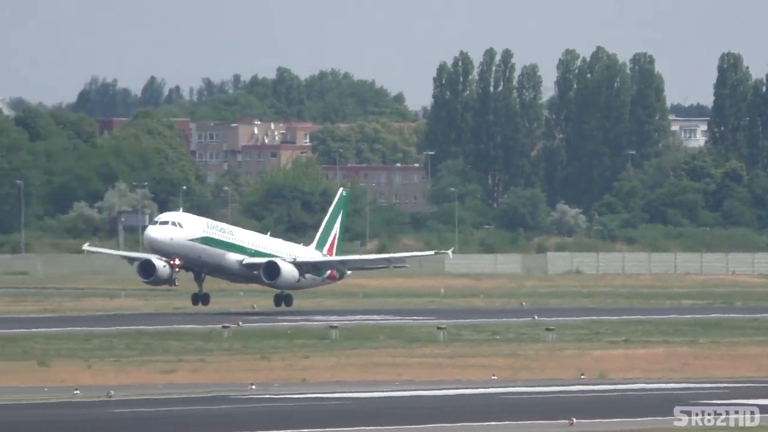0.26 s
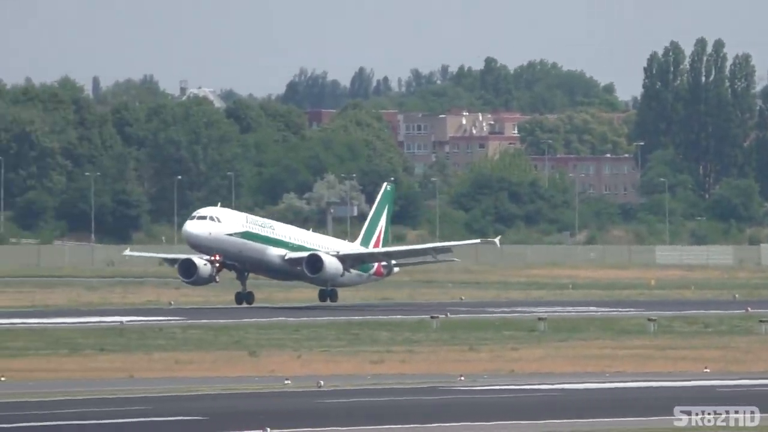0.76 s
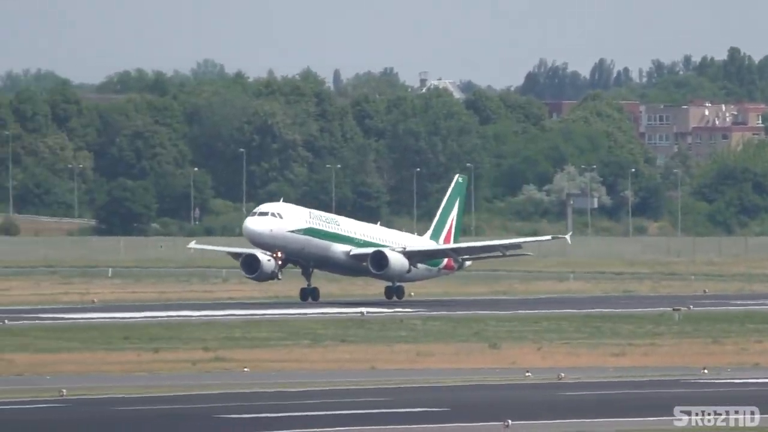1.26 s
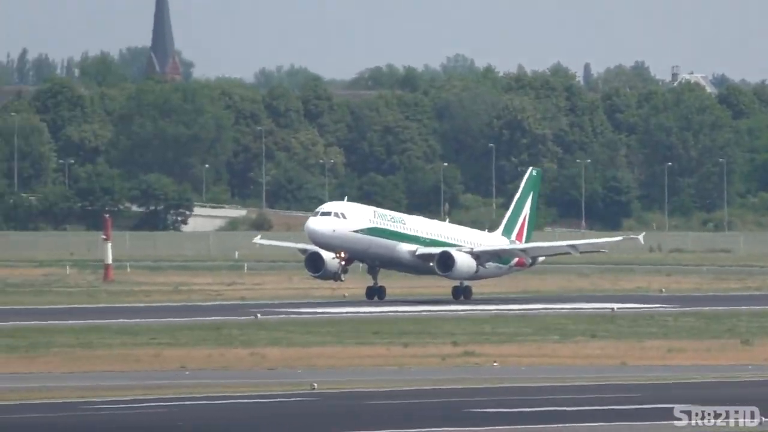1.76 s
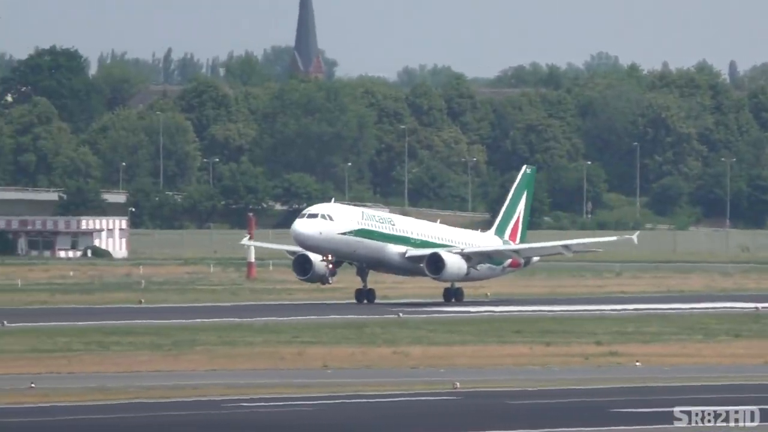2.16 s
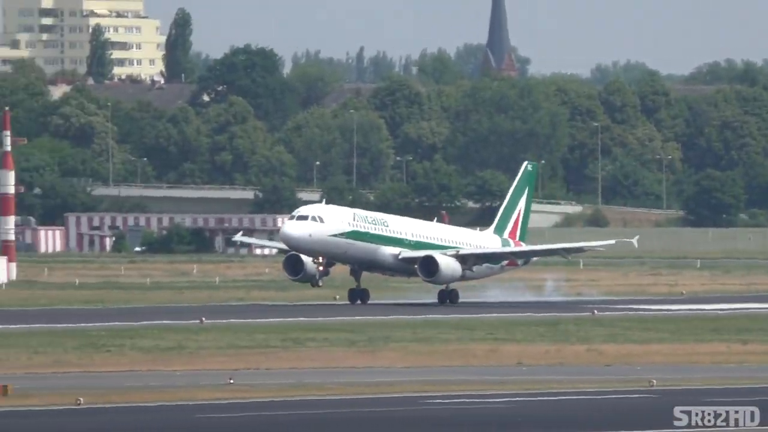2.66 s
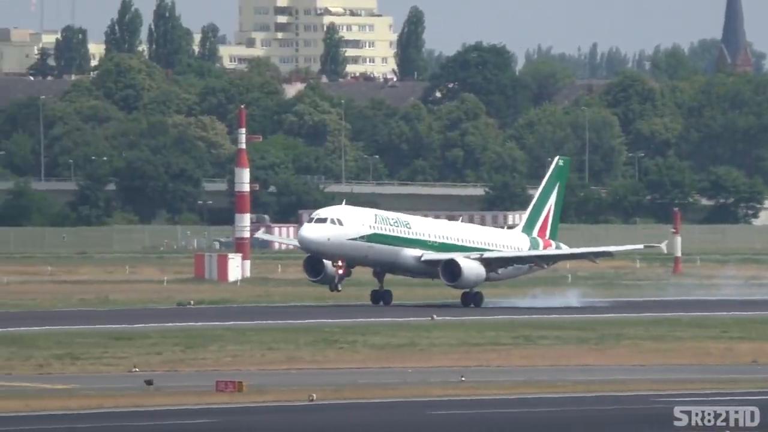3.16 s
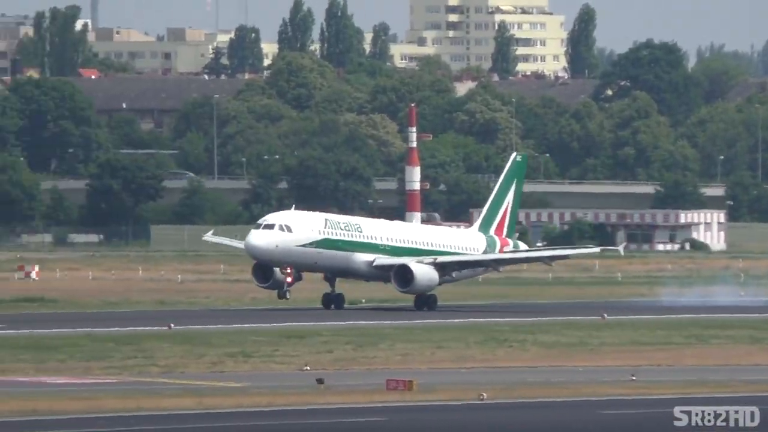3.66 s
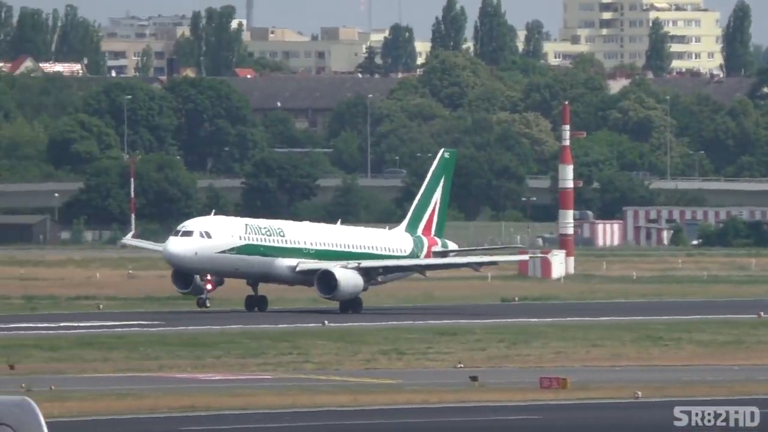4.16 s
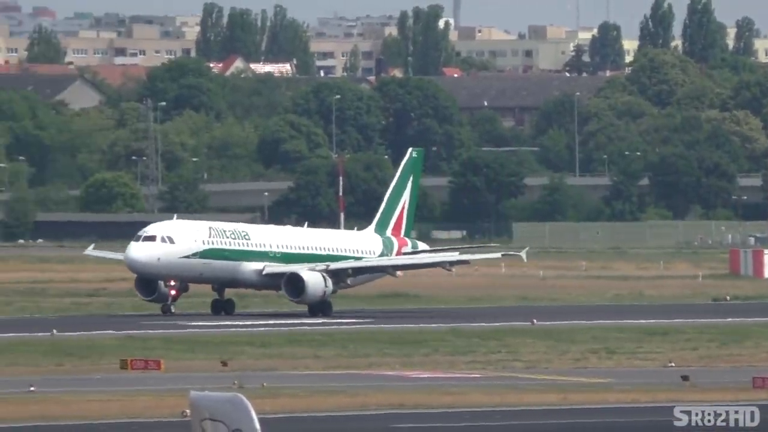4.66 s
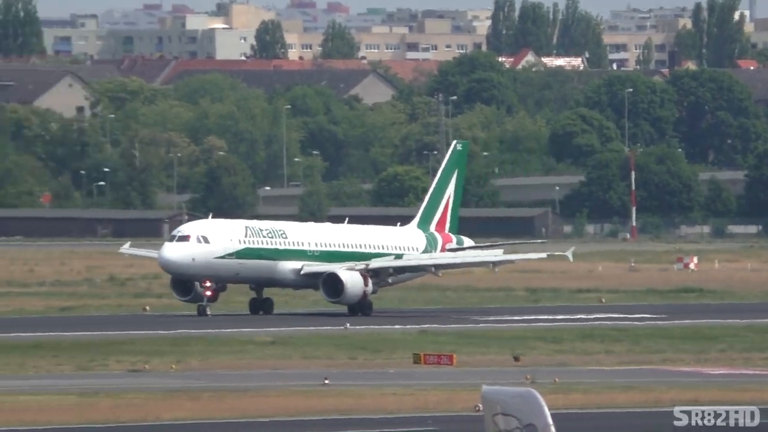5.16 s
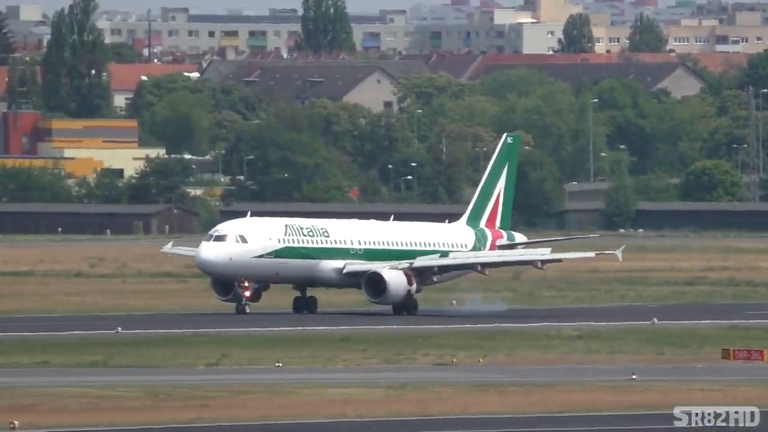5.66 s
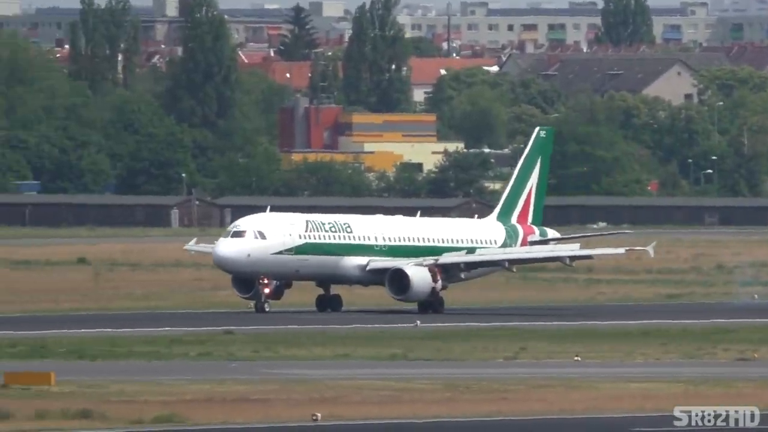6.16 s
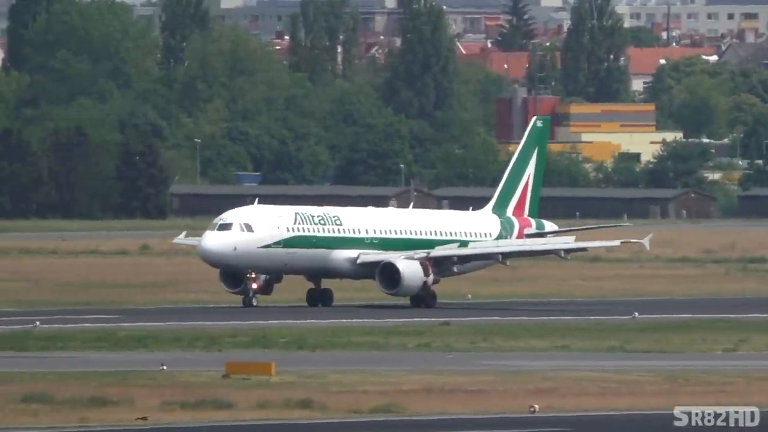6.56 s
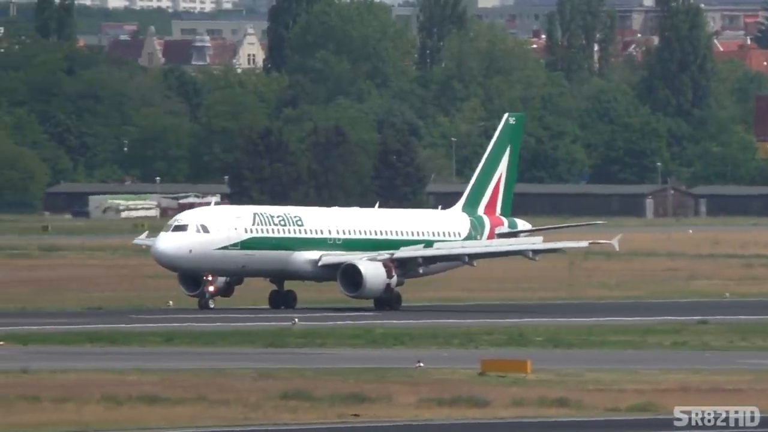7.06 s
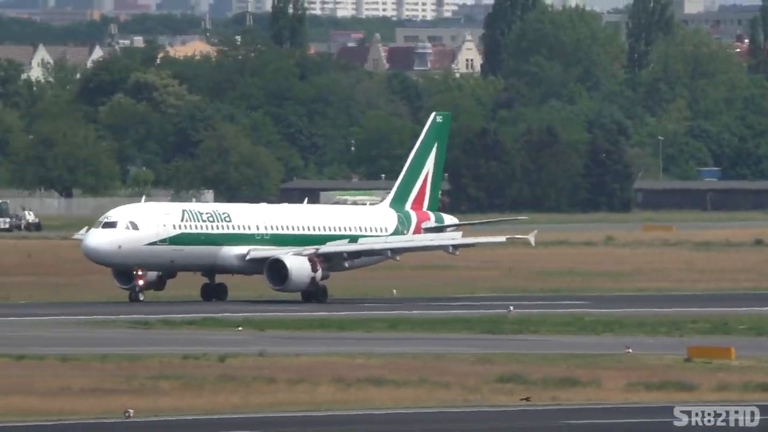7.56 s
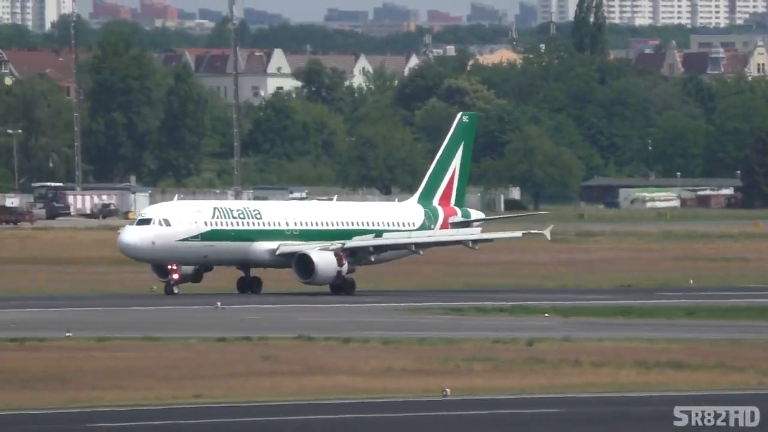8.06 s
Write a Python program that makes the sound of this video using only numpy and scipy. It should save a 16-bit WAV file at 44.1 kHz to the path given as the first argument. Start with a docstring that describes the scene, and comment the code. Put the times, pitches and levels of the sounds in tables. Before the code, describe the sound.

Outdoors beside an airfield, wind presses on an unprotected microphone with deep, uneven rumble and flutter, louder than everything else. Behind it a distant twin-engine jet rolls past with a steady dull roar and a thin, wavering fan whine. A tiny buzz and later a faint falling whistle slip by. Around six and a half seconds, three hard gusts thump close together and briefly push the engine sound down.

```python
"""A distant twin-engine airliner runs along a runway: its exhaust is shaped noise, roaring dully.
Over it lie two fans' blade tones and thin turbine tones, wavering as turbulent air scatters them.
Wind eddies rumble and flutter on the microphone as band-shaped noise; hard buffets are short pressure swings.
A brief buzz of ticks, a faint falling whistle and white microphone hiss are added.
The recorder's limiter ducks everything under the hardest buffets."""
import sys
import numpy as np
from scipy import signal
from scipy.fft import rfft, irfft, next_fast_len
from scipy.io import wavfile
from scipy.ndimage import uniform_filter1d, minimum_filter1d

SR = 44100
rng = np.random.default_rng(int(sys.argv[2]) if len(sys.argv) > 2 else 0)


def pcm_store(signal):
    """Save signal as 16-bit PCM."""
    levels = np.round(np.clip(np.atleast_2d(signal), -1, 1) * 32767)
    wavfile.write(sys.argv[1], SR, levels.astype(np.int16).T)


N = 366471
TIME = np.arange(N) / SR  # s

# Exhaust mixing roar, fan rush and engine hiss: (frequency [Hz], relative spectral level [dB])
ROAR_SPECTRUM = [(60, 3), (150, 4.5), (250, 9), (340, 7), (420, 1), (500, 3), (700, -2), (1000, -3.5),
                 (1500, -7.5), (2100, -13.5), (3000, -34.5), (5000, -46)]
RUSH_SPECTRUM = [(1200, -9), (2000, 0), (2450, -0.5), (2900, 0), (3500, -4), (4200, -11.5), (4900, -18),
                 (6000, -20.5), (8000, -36)]
HISS_SPECTRUM = [(3500, -22), (5000, 5.5), (6300, 1.5), (7400, 0.5), (8200, 4), (9200, -4), (10000, -6),
                 (11000, -12.5), (12200, -14), (12850, -7), (13300, -13.5), (16000, -15.5)]
# How well the moving air carries the engine noise: (time [s], relative level [dB])
AIR_CARRY = [(0, -1.5), (1.1, 1.5), (2.0, 1.5), (2.25, 0.1), (3.0, 0.8), (3.2, -2.8), (3.5, -1), (3.8, -3),
             (4.25, 1.5), (4.6, -2.5), (4.9, 1.5), (5.8, 0.5), (6.43, 4), (6.68, -3), (7.42, -1.8),
             (7.72, 3), (7.97, 0.1), (8.3, 4.5)]
# Engine layers: (level at mid-run [dB], share of the carry [1], trend as the aircraft turns side-on [dB/s])
ROAR_LAW = (-30.5, 0.72, -0.32)
RUSH_LAW = (-45, 0.83, .08)
HISS_LAW = (-61, 1, .12)
# Whine of the two fans: (time [s], first fan level [dB], second fan level [dB])
FAN_WHINE = [(0, -54, -62.5), (1.35, -59, -56.5), (1.65, -52.5, -51.5), (2.2, -57.5, -59.5),
             (4.5, -55, -60), (5.05, -55.5, -50), (5.6, -56.5, -57), (6.05, -60, -43.5), (6.35, -54, -45),
             (6.6, -52, -53.5), (7.2, -59, -56.5), (7.7, -52, -50.5), (8.3, -47.5, -56)]
# Blade-passing harmonics: (relative line level [dB], relative skirt level [dB], skirt width [Hz])
BLADE_HARMONICS = [(0, -4.5, 95), (-15.5, -12.5, 190), (-20.5, -17, 280), (-46.5, -24, 500)]
# Thin turbine tones before the swell:
# (frequency [Hz], level at the start [dB], level at the end [dB], line width [Hz])
TURBINE_TONES = [(806, -53, -51.5, 4), (916, -48.5, -57, 4), (3888, -67, -58.5, 6), (8722, -81, -86, 8),
                 (9261, -78, -73, 12), (9378, -81, -78.5, 11)]
# Large and small wind eddies on the microphone: (frequency [Hz], relative spectral level [dB])
RUMBLE_SPECTRUM = [(8, -5.5), (18, -10), (28, 1.5), (48, 0.5), (62, -2), (80, -5), (100, -9.5), (130, -17),
                   (200, -43.5), (400, -85)]
FLUTTER_SPECTRUM = [(50, -17), (85, 2), (110, -1.5), (150, -3.5), (200, -6.5), (280, -17), (450, -24.5),
                    (1000, -57)]
# Strength of the wind on the microphone: (time [s], rumble level before trim [dB])
WIND_STRENGTH = [(0, -16.5), (0.33, -14.5), (0.55, -19.5), (1.0, -19.5), (1.5, -14), (2.55, -12),
                 (3.75, -12.5), (4.05, -17), (4.45, -10), (4.85, -16.9), (5.5, -11.5), (6.5, -13),
                 (6.95, -15), (7.38, -11.5), (7.6, -20.5), (7.82, -9.5), (8.14, -25.5), (8.3, -19.5)]
# Single gusts that stir up small eddies: (time [s], lift of the flutter [dB])
WIND_GUSTS = [(0.12, 3.5), (1.46, 7), (2.62, 3.5), (3.09, 3.5), (3.21, 5), (3.64, 4), (4.24, 2.5),
              (5.3, 1.5), (6.06, 4.5), (6.45, 11), (6.55, 7), (7.02, 6.5), (7.79, 3.5), (8.27, 8.5)]
# Hard buffets, ahead of the limiter: (time [s], peak level [dB], eddy frequency [Hz])
WIND_BUFFETS = [(3.212, 1.5, 90), (3.635, 0, 75), (3.668, 1.5, 40), (6.354, 7, 60), (6.456, 8.5, 80),
                (6.562, 5.5, 70)]

FAN_HZ, SECOND_FAN_HZ = 2722, 2758
ROAR_PATCH_DB, ROAR_PATCH_HZ = 1.0, 4  # rms swell of each roar band, corner of its spectrum
SHRILL_HZ, SHRILL_FOLLOWS = 9000, .55
FLUTTER_DB, FLUTTER_FOLLOWS = -26, 0.49  # level at the mean wind, share of the wind's swing
RUMBLE_LUMP_DB, FLUTTER_LUMP_DB, LUMP_HZ = 1.5, 2.08, 7.6  # rms lumps within the wind, their corner
GUST_S, GUST_RUMBLE_SHARE = 0.086, 0.43
BUFFET_S = 0.013
BUZZ_AT_S, BUZZ_S, BUZZ_DB = 3.767, .022, -23.5  # level: tick height before the high-pass
BUZZ_TICKS_PER_S, BUZZ_SLOWS_PER_S2 = 908, 1700  # rate at the middle of the buzz, its fall
WHISTLE_AT_S, WHISTLE_S, WHISTLE_DB = 7.035, .13, -34
WHISTLE_HZ, WHISTLE_FALL_HZ_PER_S = 572, 1300  # pitch at the middle of the whistle, its fall
WHISTLE_RUSH_DB, WHISTLE_RUSH_HZ, WHISTLE_RUSH_WIDTH_HZ = -40, 850, 175
MIC_HISS_DB = -74
LIMITER_CEILING_DB, LIMITER_RELEASE_DB_PER_S = -1.2, 95
CUTOFF_HZ = 15900


def jet_noise(carry_db, flicker_db=0.76, flicker_hz=8):
    """Broadband turbulence noise: roar, rush and hiss share one flicker in the moving air, the roar least."""
    air_db = flicker_db * drift(flicker_hz)
    roar_db = follow(ROAR_LAW, carry_db) + .6 * air_db
    rush_db = follow(RUSH_LAW, carry_db) + air_db
    hiss_db = follow(HISS_LAW, carry_db) + air_db
    roar = from_db(roar_db) * patchy(coloured(ROAR_SPECTRUM))
    rush = from_db(rush_db) * coloured(RUSH_SPECTRUM)
    hiss = from_db(hiss_db) * coloured(HISS_SPECTRUM)
    return roar + rush + hiss


def patchy(remainder, count=7):
    """Refraction: the air bends each band below 2 kHz towards the microphone and away, at random."""
    out = 0
    for edge_hz in np.geomspace(250, 2000, count):
        lowpass = signal.butter(4, edge_hz, fs=SR, output="sos")
        band = signal.sosfiltfilt(lowpass, remainder)
        out = out + band * from_db(ROAR_PATCH_DB * drift(ROAR_PATCH_HZ))
        remainder = remainder - band
    return out + remainder


def follow(law, carry_db):
    """Propagation law: an engine layer's level follows the air's carry and the aircraft's progress."""
    mid_db, share, db_per_s = law
    return mid_db + share * carry_db + db_per_s * (TIME - TIME.mean())


def fans(carry_db, line_hz=6, scatter_law=(-55.3, .9, .25)):
    """Blade-passing harmonics of two fans slightly apart in speed, in skirts scattered by the turbulent jet."""
    scatter_db = follow(scatter_law, carry_db)  # for the skirts and the upper harmonics
    out = 0
    for blade_hz, whine_db in zip((FAN_HZ, SECOND_FAN_HZ), in_time(FAN_WHINE)):
        phase = turn(blade_hz * (1 + .0008 * drift(1.5)))
        for order, (line_db, skirt_db, skirt_hz) in enumerate(BLADE_HARMONICS, 1):
            level_db = whine_db if order == 1 else scatter_db
            line = scattered(order * phase, line_hz * order, steady=3 / order)
            skirt = scattered(order * phase, skirt_hz)
            out = out + from_db(line_db + level_db) * line
            out = out + from_db(skirt_db + scatter_db) * skirt
    return out


def turbines(carry_db, wander=0.000402, skirt_db=-7):
    """Rotor tones broadened by scattering: most swell with the air's carry, the shrillest also with the fans."""
    whine_db = np.maximum(*in_time(FAN_WHINE))  # the louder fan
    shrill_db = SHRILL_FOLLOWS * (whine_db - whine_db.mean() + carry_db)
    out = 0
    for hz, start_db, end_db, width_hz in TURBINE_TONES:
        phase = turn(hz * (1 + wander * drift(1)))
        line = scattered(phase, width_hz, steady=1.3)
        skirt = from_db(skirt_db) * scattered(phase, 0.0074 * hz)
        swell_db = shrill_db if hz > SHRILL_HZ else carry_db
        level_db = start_db + (end_db - start_db) * TIME / TIME[-1] + swell_db
        out = out + from_db(level_db) * (line + skirt)
    return out


def wind(rumble_trim_db=-0.2):
    """Turbulent pressure on the microphone: large eddies rumble, small ones flutter, buffets swing briefly."""
    wind_db, = in_time(WIND_STRENGTH)
    gust_db = sum(lift_db * bump(s, GUST_S) for s, lift_db in WIND_GUSTS)
    lumps = drift(LUMP_HZ)
    rumble_db = wind_db + rumble_trim_db + GUST_RUMBLE_SHARE * gust_db + RUMBLE_LUMP_DB * lumps
    flutter_db = FLUTTER_DB + FLUTTER_FOLLOWS * (wind_db - wind_db.mean())
    flutter_db = flutter_db + gust_db + FLUTTER_LUMP_DB * lumps
    rumble = from_db(rumble_db) * evened(coloured(RUMBLE_SPECTRUM), seconds=.14)
    flutter = from_db(flutter_db) * evened(coloured(FLUTTER_SPECTRUM), seconds=0.11)
    out = rumble + flutter
    # the largest ordinary eddies are rounded off
    out /= (1 + (out / .85) ** 4) ** (1 / 4)
    # each buffet takes the place of the ordinary eddies around its peak
    for s, peak_db, eddy_hz in WIND_BUFFETS:
        shape = bump(s, BUFFET_S)
        swing = from_db(peak_db) * np.cos(2 * np.pi * eddy_hz * (TIME - s))
        out = out * (1 - shape) + shape * swing
    return out


def buzz(edge_hz=4000):
    """Impulse train: a quick run of slowing ticks swells and dies, high-passed to leave the treble."""
    rate = np.maximum(BUZZ_TICKS_PER_S - BUZZ_SLOWS_PER_S2 * (TIME - BUZZ_AT_S), 0)
    impulses = np.diff(np.floor(np.cumsum(rate) / SR), prepend=0)
    ticks = impulses * from_db(BUZZ_DB) * bump(BUZZ_AT_S, BUZZ_S)
    highpass = signal.butter(4, edge_hz, "high", fs=SR, output="sos")
    return signal.sosfilt(highpass, ticks + 1e-18)


def whistle():
    """Frequency glide: a short, slightly rough tone slides down under a puff of narrow-band rush."""
    hz = WHISTLE_HZ - WHISTLE_FALL_HZ_PER_S * (TIME - WHISTLE_AT_S)
    tone = from_db(WHISTLE_DB) * scattered(turn(hz), 25, steady=4)
    rush_phase = 2 * np.pi * WHISTLE_RUSH_HZ * TIME
    rush = from_db(WHISTLE_RUSH_DB) * scattered(rush_phase, WHISTLE_RUSH_WIDTH_HZ)
    return bump(WHISTLE_AT_S, WHISTLE_S) * (tone + rush)


def microphone_hiss():
    """Self-noise: a steady white noise of equal power at all frequencies."""
    return from_db(MIC_HISS_DB) * rng.standard_normal(N)


def limiter(x):
    """Peak limiting: gain drops just ahead of any peak over the ceiling, then climbs back."""
    over_db = np.maximum(20 * np.log10(np.abs(x) + 1e-9) - LIMITER_CEILING_DB, 0)
    recovery_db = LIMITER_RELEASE_DB_PER_S * TIME
    held_db = np.maximum.accumulate(over_db + recovery_db) - recovery_db
    early_db = minimum_filter1d(-held_db, size=200)  # window centred, so it looks ahead
    return x * from_db(uniform_filter1d(early_db, size=200))


def scattered(phase, width_hz, steady=0):
    """Turbulent scattering: a tone keeps a steady part and gains a part of random strength and phase."""
    in_phase = (steady + drift(width_hz)) * np.sin(phase)
    quadrature = drift(width_hz) * np.cos(phase)
    return rms_one(in_phase + quadrature)


def turn(hz):
    """Phase is the time integral of a moving frequency."""
    return 2 * np.pi * np.cumsum(hz) / SR


def drift(corner_hz):
    """Random modulation: low-passed noise of rms 1, its amplitude spectrum halved at the corner."""
    return noise(lambda hz: 1 / (1 + (hz / corner_hz) ** 2))


def coloured(spectrum):
    """Spectral shaping: noise through points on a log-frequency axis, falling away beyond both ends."""
    points_hz, db = np.transpose(spectrum)

    def gain_at(hz):
        inside = from_db(np.interp(np.log(hz), np.log(points_hz), db))
        ends = np.minimum(hz / points_hz[0], 1) * np.minimum(points_hz[-1] / hz, 1)
        return inside * ends ** 2

    return noise(gain_at)


def noise(gain_at):
    """Filtering in frequency: white noise takes the amplitude spectrum gain_at(Hz), at rms 1."""
    size = next_fast_len(N)
    white = rfft(rng.standard_normal(size))
    hz = np.maximum(np.arange(len(white)) * SR / size, 1e-3)
    return rms_one(irfft(white * gain_at(hz), size)[:N])


def evened(x, seconds):
    """Envelope division: noise is divided by its running rms, taking out its own slow swells."""
    return x / np.sqrt(uniform_filter1d(x ** 2, int(seconds * SR)) + 1e-9)


def bump(s, length):
    """Gaussian envelope around one moment, at 1/e half a length to either side."""
    return np.exp(-np.minimum((2 * (TIME - s) / length) ** 2, 50))


def in_time(rows):
    """Linear interpolation of a table's columns at every sample."""
    s, *columns = np.transpose(rows)
    return [np.interp(TIME, s, c) for c in columns]


def from_db(db):
    """Amplitude ratio of a level in decibels."""
    return 10 ** (np.asarray(db) / 20)


def rms_one(x):
    """Normalisation to unit root-mean-square amplitude."""
    return x / np.sqrt(np.mean(x ** 2) + 1e-20)


def scene():
    """Superposition: the airliner far off, the wind close by and the small sounds simply add."""
    carry_db, = in_time(AIR_CARRY)
    airliner = jet_noise(carry_db) + fans(carry_db) + turbines(carry_db)
    return (airliner + wind() + buzz() + whistle() + microphone_hiss())[None]


def record(dry):
    """Recording chain: the limiter holds the buffets, then a steep low-pass cuts the top."""
    lowpass = signal.ellip(10, .1, 90, CUTOFF_HZ, fs=SR, output="sos")
    return signal.sosfilt(lowpass, limiter(dry[0]))[None]


dry = scene()
out = record(dry)
pcm_store(out)
```